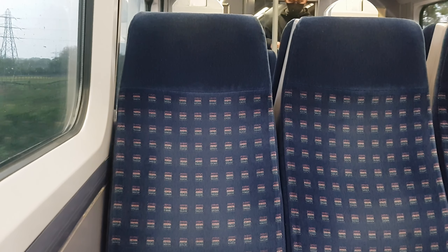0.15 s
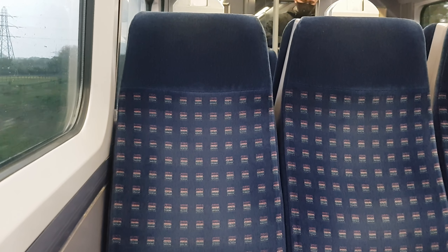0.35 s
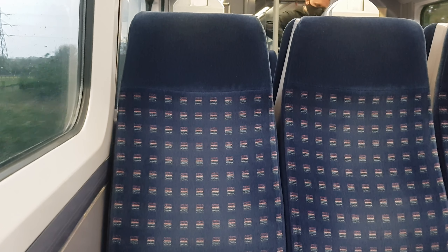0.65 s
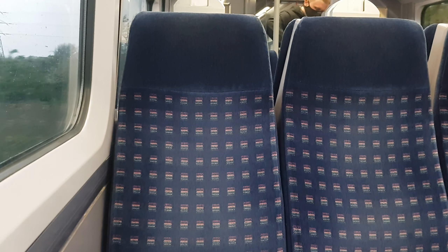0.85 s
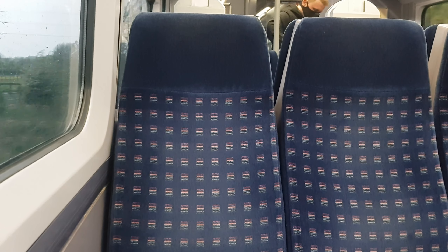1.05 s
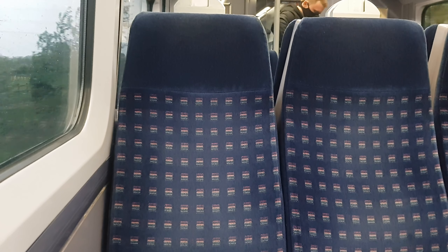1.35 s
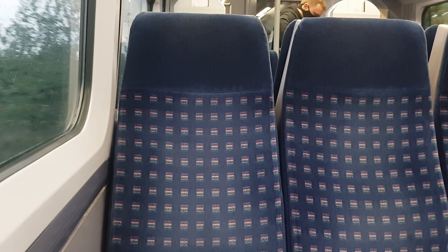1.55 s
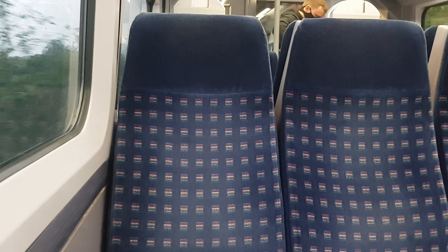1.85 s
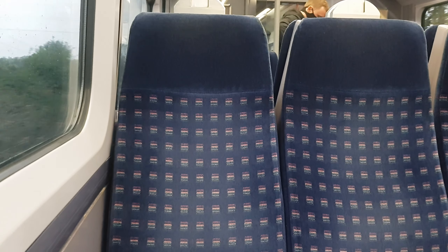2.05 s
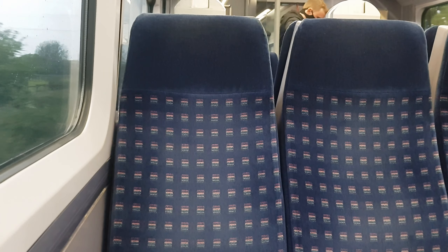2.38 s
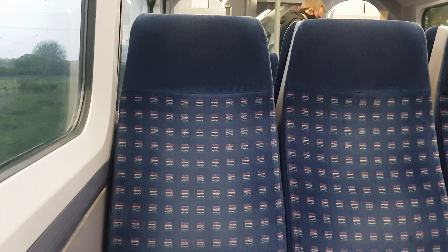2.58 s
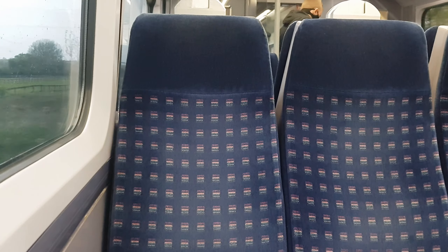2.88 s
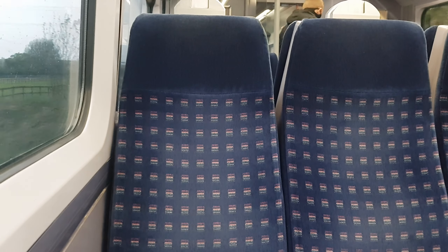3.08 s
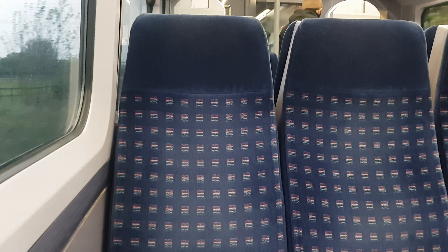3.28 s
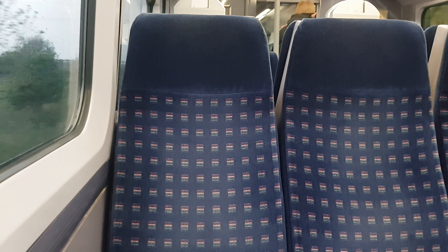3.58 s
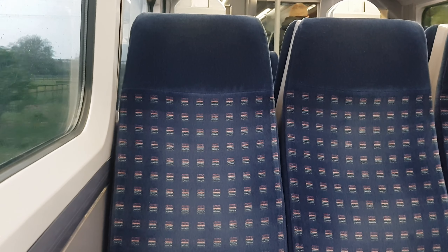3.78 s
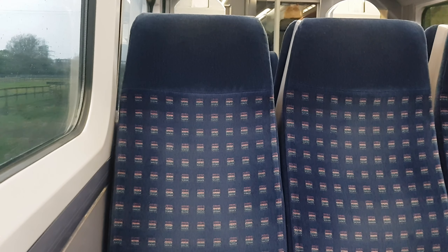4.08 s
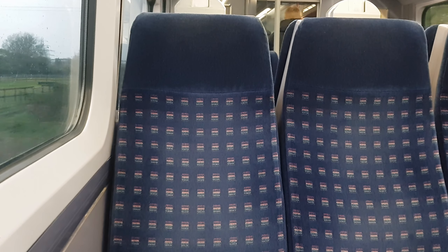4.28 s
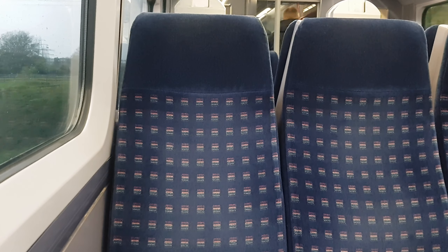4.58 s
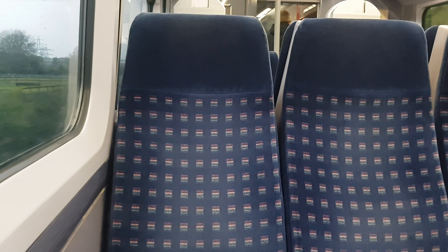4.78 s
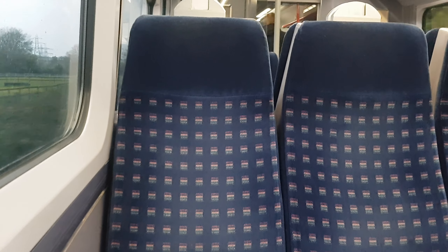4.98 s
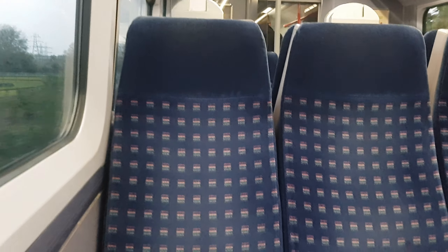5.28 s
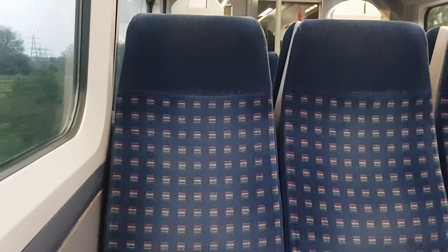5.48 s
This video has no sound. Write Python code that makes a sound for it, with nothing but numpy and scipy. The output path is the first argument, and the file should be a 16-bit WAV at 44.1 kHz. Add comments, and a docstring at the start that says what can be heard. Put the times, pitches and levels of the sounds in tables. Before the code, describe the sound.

Heard from a seat in an enclosed carriage: continuous bass-heavy diesel throb, beating tones and muffled wheel-on-rail rush, the treble softened by windows and seats. The engine holds nearly constant pitch while a low hum rises very slightly and swells mid-way. After five seconds a sleeve brushes near the handheld stereo microphones, crisp and quiet with small ticks, and the train runs on.

```python
"""Inside the saloon of a diesel railcar at speed. From the start the underfloor engine drones through the floor as a
comb of steady tones that throbs once per working cycle; geared auxiliaries whine and beat against it, and filtered
noise makes the roar and the faint ring of the wheels. Two faint sleeve strokes, rubbing noise, pass in the first second.
The engine's pitch crests at 1.4 s, then sags slowly, while a low hum climbs with the train's speed and is loudest
a little past 3 s. In the last second the sleeve rustles close to the two microphones, with four sharp snaps."""
import sys
import numpy as np
from scipy import signal
from scipy.fft import rfft, irfft, next_fast_len
from scipy.io import wavfile

SR = 44100
rng = np.random.default_rng(int(sys.argv[2]) if len(sys.argv) > 2 else 0)


def int16_out(signal):
    """Quantize to a 16-bit WAV file."""
    q = np.round(np.clip(np.atleast_2d(signal).T, -1, 1) * 32767)
    wavfile.write(sys.argv[1], SR, q.astype(np.int16))


N = 248724
STEP = 10   # tones are low, so they are computed at every tenth sample


def from_db(db):
    """Decibels to gain."""
    return 10 ** (np.asarray(db) / 20)


def rms_one(x):
    """Scale to rms 1."""
    return x / np.sqrt(np.mean(x ** 2) + 1e-20)


def at_hz(points, hz):
    """Read a table's second column on a log-frequency axis."""
    points = np.array(points)
    return np.interp(np.log(hz), np.log(points[:, 0]), points[:, 1])


def drift(rate_hz, size=N, step=1):
    """Slow chance of spread 1: noise at every 100th sample through a double one-pole low-pass."""
    pole = np.exp(-200 * np.pi * rate_hz / SR)
    noise = rng.standard_normal(N // 100 + 1002)
    slow = signal.lfilter([1], [1, -2 * pole, pole * pole], noise)[1000:]   # drop the filter's start-up
    return np.interp(np.arange(size) * step / 100, np.arange(len(slow)), rms_one(slow))


# How alike the two microphones hear the saloon: pitch_hz, likeness (1 same, 0 unrelated, -1 opposite)
LIKENESS = [(20, .997), (150, .995), (300, .87), (600, .3), (780, .6), (1000, -.1), (1300, -.15),
            (1550, -.4), (1800, 0), (15000, 0)]
# Stereo balance of the noises: pitch_hz, lean_db (left over right)
LEAN = [(60, 3), (110, 6), (200, 4), (380, 5), (700, 0.5), (1290, 1), (2380, 1.5), (4400, 0), (8120, -3),
        (15000, 2)]


def coloured(gain):
    """Stereo noise of a given gain over frequency, alike on both sides in the bass; gain 1 = 0 dB per Hz."""
    size = next_fast_len(N)
    hz = np.maximum(np.arange(size // 2 + 1) * SR / size, 1)
    mid, side = rfft(rng.standard_normal((2, size))) * np.sqrt(SR / 4)
    alike = np.clip(at_hz(LIKENESS, hz), -1, 1)
    pair = np.sqrt(1 + alike) * mid + np.sqrt(1 - alike) * side * [[1], [-1]]
    balance = from_db(at_hz(LEAN, hz) / 2 * [[1], [-1]])
    return irfft(pair * gain(hz) * balance, size)[:, :N]


def tone(phase, hz, level_db, lean_db, waver_db):
    """One wavering tone; the saloon's standing waves part its two phases by the likeness at its pitch."""
    parted = np.arccos(np.clip(at_hz(LIKENESS, hz), -1, 1)) * rng.choice([-.5, .5])
    waver = waver_db * drift(1.5, size=len(phase), step=STEP)
    gain = np.sqrt(2) * from_db(level_db + waver)   # a sine's peak is root 2 above its rms
    left, right = from_db([lean_db / 2, -lean_db / 2])
    both = np.stack([left * np.cos(phase + parted), right * np.cos(phase - parted)])
    return gain * both / np.sqrt((left ** 2 + right ** 2) / 2)


# Roar of wheels, air and ventilation through the body, before ripple and edges: pitch_hz, density_db (dB per Hz)
ROAR = [(20, -82.5), (30, -68.5), (65, -52), (100, -55.5), (145, -49.5), (200, -55), (400, -60.5),
        (490, -66.5), (600, -65.5), (800, -71.5), (1150, -74), (1600, -77.5), (2450, -79), (2650, -82),
        (3300, -90.5), (6600, -98.5)]


def roar(ripple_db=2.5):
    """Broad roar with the saloon's fine peaks and dips, its treble stopped by glazing and seats."""
    points = np.arange(700)
    depth = np.clip(points / 22.0, 0, 1)   # ripple grows in over the lowest 704 Hz
    ripple = from_db(ripple_db * rng.standard_normal(700) * depth)

    def gain(hz):
        standing = np.interp(hz, points * 32, ripple)   # one chance level every 32 Hz
        treble_edge = 1 + (hz / 7060.0) ** 29.0
        bass_edge = 1 + (22. / hz) ** 8.
        return from_db(at_hz(ROAR, hz)) * standing / np.sqrt(treble_edge * bass_edge)

    return coloured(gain)


# Wheel and rail modes shaken by rough rail: pitch_hz, width_hz (at half amplitude), level_db (mean, rms)
WHEEL_MODES = [(425, 30, -47), (930, 65, -48), (1010, 50, -56), (1260, 25, -55), (1390, 32, -57),
               (1421, 7, -55.5), (1467, 8, -59.5), (1557, 5, -58), (1678, 8, -64), (1822, 20, -66),
               (2555, 8, -71), (2895, 25, -72), (4225, 40, -76), (4490, 12, -81)]


def wheels():
    """Noise through each steep wheel or rail resonance, swelling and fading on its own."""
    out = 0
    for pitch_hz, width_hz, level_db in WHEEL_MODES:
        ringing = coloured(lambda hz: 1 / (1 + (2 * (hz - pitch_hz) / width_hz) ** 2))
        swell_db = 1.8 * drift(1.5)
        out = out + from_db(level_db + swell_db) * rms_one(ringing)
    return out


HUM_START_HZ, HUM_CLIMB_HZ_PER_S = 68.35, .545   # the hum climbs as the train gains speed
FLOOR_HZ, FLOOR_WIDTH_HZ, HUM_DB = 70.1, 3.0, -25.2   # floor resonance, and the hum's level on its top


def track_hum(t):
    """A hum climbing with speed, as from sleepers passing under the wheels; loudest on the floor's resonance."""
    hum_hz = HUM_START_HZ + HUM_CLIMB_HZ_PER_S * t
    off_resonance = 2 * (hum_hz - FLOOR_HZ) / FLOOR_WIDTH_HZ
    hum_db = HUM_DB - 10 * np.log10(1 + off_resonance ** 2)
    phase = 2 * np.pi * np.cumsum(hum_hz) * STEP / SR
    return tone(phase, hum_hz.mean(), hum_db, lean_db=1.0, waver_db=1.4)


# Tone of rubbed cloth: pitch_hz, density_db (dB per Hz, relative)
CLOTH = [(2000, -3.5), (3500, -3.5), (6300, -4), (8100, -12), (10000, -4), (12000, 0), (13500, 0),
         (15500, -3.5)]
# Sleeve strokes: start_s (at full strength), hold_s, level_db (sheen, rms before roughening),
# swell_s, fade_s (each per STROKE_RANGE_DB), body_db (against the sheen), lean_db (left over right)
STROKES = [(0.034, .02, -61.5, .2, 0.46, 0.5, 1), (.62, 0.19, -63, .7, .25, -9, 3),
           (5.05, .08, -57.5, .14, .15, 0, 2), (5.18, .04, -45.5, .1, 0.19, -3.5, 0.5),
           (5.36, 0.094, -53, 0.33, .3, 0, 5), (5.49, .05, -52, .2, .13, -4.5, 5)]
STROKE_RANGE_DB = 20   # a swell or fade spans this much in its time
# Threads letting go: start_s, level_db (scale of the noise burst at its start, before the high-pass)
SNAPS = [(5.0117, -49), (5.1329, -39), (5.1524, -37), (5.2038, -26)]


def sleeve(shared=.6, lag_samples=5):
    """Rubbing noise roughened by uneven fibres, with sharp snaps; its shared sheen reaches the right side first."""
    sheen = rms_one(coloured(lambda hz: from_db(at_hz(CLOTH, hz)) * (hz > 8000)))
    late_right = np.roll(sheen[1], round(lag_samples))
    sheen[0] = np.sqrt(1 - min(shared, 1) ** 2) * sheen[0] + shared * late_right
    body = rms_one(coloured(lambda hz: from_db(at_hz(CLOTH, hz)) * (hz < 8000) / (1 + (1300.0 / hz) ** 4.8)))

    grain = np.repeat(rng.standard_normal(N // 40 + 1), 40)[:N]   # a new chance level every 40 samples
    fibres = from_db(1.0 * grain + 1.2 * drift(40))

    t = np.arange(N) / SR
    sheen_power, body_power = np.zeros((2, N)), np.zeros((2, N))
    for start_s, hold_s, level_db, swell_s, fade_s, body_db, lean_db in STROKES:
        before = np.maximum(start_s - t, 0) / swell_s
        after = np.maximum(t - start_s - hold_s, 0) / fade_s
        side_db = lean_db / 2 * np.array([[1], [-1]])
        gain = from_db(level_db - STROKE_RANGE_DB * (before + after) + side_db)
        sheen_power += gain ** 2
        body_power += (gain * from_db(body_db)) ** 2
    rub = fibres * (np.sqrt(sheen_power) * sheen + np.sqrt(body_power) * body)

    bursts = np.zeros((2, N))
    fade = np.exp(-np.arange(200) / SR / 0.00054)   # dies with a 0.54 ms time constant
    for start_s, level_db in SNAPS:
        at = round(start_s * SR)
        bursts[:, at:at + 200] = from_db(level_db) * fade * rng.standard_normal((2, 200))
    high_pass = signal.butter(4, 9000, "high", fs=SR, output="sos")
    return rub + signal.sosfilt(high_pass, bursts + 1e-18)


# Auxiliaries geared to the engine: multiple (of their shaft), level_db (rms), lean_db (left over right)
GEAR = [(1, -55, 4), (2, -47.5, -2), (3, -55, -7), (4, -66, -7)]
GEAR_RATIO = 22.585   # shaft turns per working cycle
# A pump driven off the engine: multiple (of its shaft), level_db (rms), lean_db (left over right)
PUMP = [(4, -40, -2.5), (5, -42.5, 0), (8, -39.5, 1.5), (10, -47, 1), (12, -46.5, 12), (14, -44.5, 4),
        (16, -46, 4), (24, -57, -3), (28, -42, -3), (42, -54, -7), (46, -64, -3), (54, -60, 3),
        (56, -55, 6.5), (70, -58, -5.5)]
PUMP_RATIO = 14 / 11   # shaft turns per working cycle
# Side tones beside the engine's multiples, as from engine and pump mixing; close ones beat with them:
# multiple (of the working cycle), level_db (rms), lean_db (left over right)
SIDE_TONES = [(9.48, -45, 3), (9.902, -40, 2), (10.52, -47, 2), (14.11, -49, 5), (17.18, -47.5, 4),
              (20.18, -52, 6), (29.18, -54, 4), (64.5, -58, 1), (65.455, -61, 0)]


def auxiliary(turns, cycle_hz, ratio, table):
    """Tones locked at a fixed ratio to the engine, each from a chance starting phase."""
    out = 0
    for multiple, level_db, lean_db in table:
        phase = 2 * np.pi * (multiple * ratio * turns + rng.random())
        out = out + tone(phase, multiple * ratio * cycle_hz, level_db, lean_db, waver_db=.5)
    return out


# Engine tones at this seat: multiple (of the working cycle), level_db (rms), lean_db (left over right)
ENGINE = [(2, -51, -5), (4, -38, 3), (5, -35.5, 2), (6, -30, 3.5), (8, -33.5, 2), (9, -27, 1), (10, -26, 2),
          (11, -28.5, 3.5), (12, -34, 2), (13, -42.5, -1.5), (14, -39, -1), (15, -38, 6), (16, -38, 9.5),
          (17, -36.5, -5), (20, -41.5, -2), (21, -43, 1.5), (24, -45.5, -1), (25, -49, 2.5), (28, -40, 6.5),
          (29, -47, 7), (30, -45, 3.5), (31, -51, 2), (32, -56, 2), (35, -49, 4.5), (36, -49.5, -19),
          (38, -53, -1), (39, -48, 9.5), (41, -56, 1), (42, -58, -1), (43, -56, 1), (44, -51.5, 4),
          (48, -54, -0.5), (59, -58, 0), (61, -52, 2.5), (62, -53, 13), (63, -58, 0), (64, -56, -4.5),
          (66, -56, -3)]
# The engine's many weaker tones, each of chance strength: pitch_hz, level_db (mean, rms)
WEAK_TONES = [(40, -55), (110, -59), (280, -53), (480, -58), (600, -61.5), (780, -72.5), (920, -57),
              (1100, -73.5), (1500, -67.5)]


def engine(turns, cycle_hz, lag=.123, prompt=12.2, scatter=.2):
    """Multiples of the cycle: the floor passes low ones late, so each throb slides down in pitch; past that
    resonance the tones turn over in sign and the saloon scatters the phases (radians) more and more."""
    strong = {multiple: (level_db, lean_db) for multiple, level_db, lean_db in ENGINE}
    out = 0
    for k in range(2, 90):
        weak_db = at_hz(WEAK_TONES, k * cycle_hz) + rng.normal(0, 3.5)
        weak_lean_db = rng.normal(1.0, 4.5)
        level_db, lean_db = strong.get(k, (weak_db, weak_lean_db))
        floor_phase = lag * max(prompt - k, 0) ** 3
        turnover = np.pi * (k < prompt)
        late = floor_phase + rng.normal(turnover, scatter * max(k - prompt, 0))
        out = out + tone(2 * np.pi * k * turns + late, k * cycle_hz, level_db, lean_db, waver_db=1.4)
    return out


CYCLE_HZ, CYCLE_TOP_S, CYCLE_SAG_HZ_PER_S2 = 14.6843, 1.4, .00125   # working cycles: crest, then a slow sag


def scene():
    """Roar, wheels, hum and a passenger's sleeve around the drive line."""
    t = np.arange(0, N, STEP) / SR
    cycle_hz = CYCLE_HZ - CYCLE_SAG_HZ_PER_S2 * (t - CYCLE_TOP_S) ** 2
    turns = np.cumsum(cycle_hz) * STEP / SR   # working cycles so far
    mean_hz = cycle_hz.mean()
    tones = track_hum(t)
    tones = tones + auxiliary(turns, mean_hz, GEAR_RATIO, GEAR)
    tones = tones + auxiliary(turns, mean_hz, PUMP_RATIO, PUMP)
    tones = tones + auxiliary(turns, mean_hz, 1, SIDE_TONES)
    tones = tones + engine(turns, mean_hz)
    tones = signal.resample_poly(tones, STEP, 1, axis=1, window=("kaiser", 11), padtype="smooth")
    return roar() + wheels() + sleeve() + tones[:, :N]


# Microphone self-noise: pitch_hz, density_db (dB per Hz)
HISS = [(5000, -112), (8100, -112), (10000, -105), (12500, -104), (15500, -107)]
CUTOFF_HZ = 15750


def record(dry):
    """The microphones add a faint hiss, the sound fades in over 2 ms and the top is cut."""
    sound = dry + coloured(lambda hz: from_db(at_hz(HISS, hz)))
    fade_in = np.sin(np.pi / 2 * np.minimum(np.arange(N) / (.002 * SR), 1)) ** 2
    low_pass = signal.ellip(14, .5, 80, CUTOFF_HZ, fs=SR, output="sos")
    return signal.sosfilt(low_pass, sound * fade_in)


dry = scene()
out = record(dry)
int16_out(out)
```